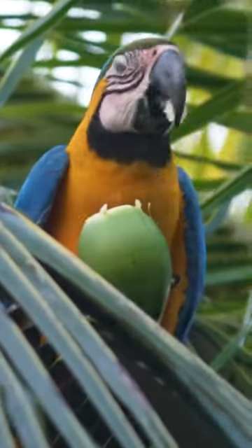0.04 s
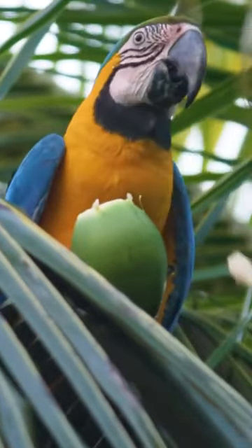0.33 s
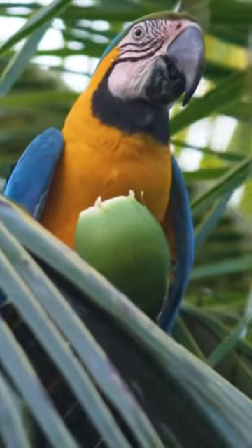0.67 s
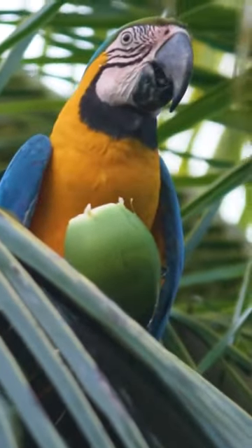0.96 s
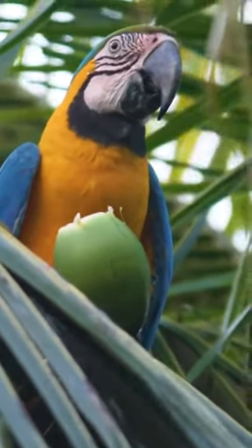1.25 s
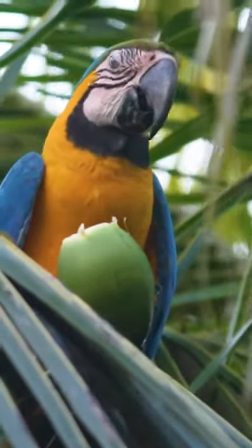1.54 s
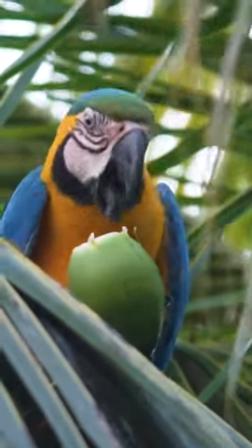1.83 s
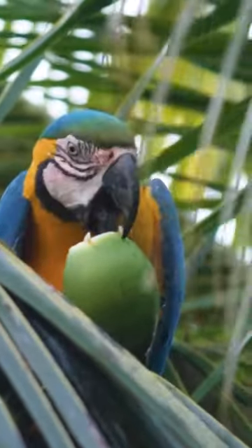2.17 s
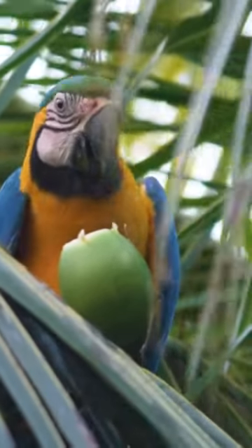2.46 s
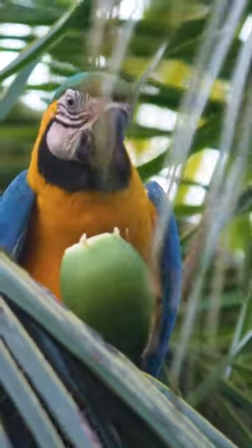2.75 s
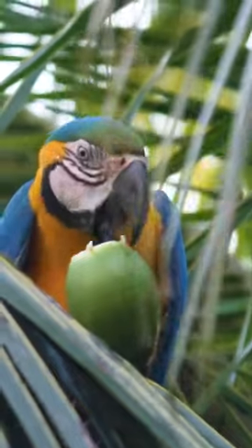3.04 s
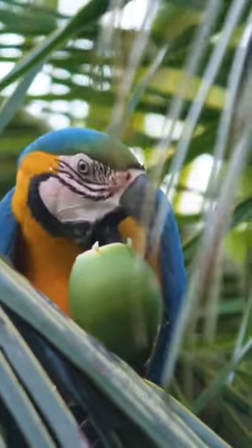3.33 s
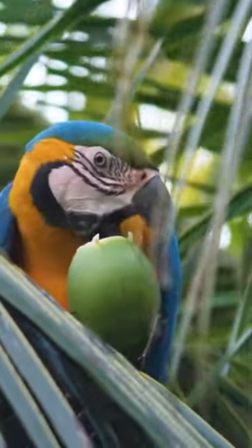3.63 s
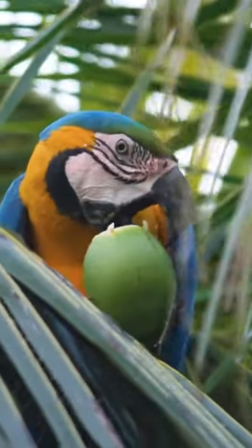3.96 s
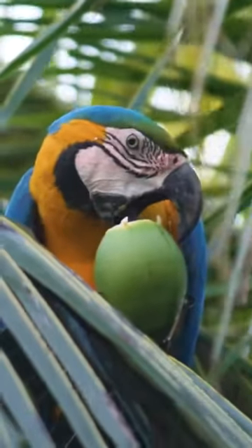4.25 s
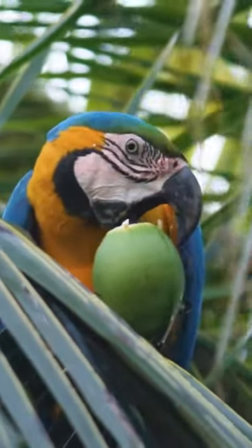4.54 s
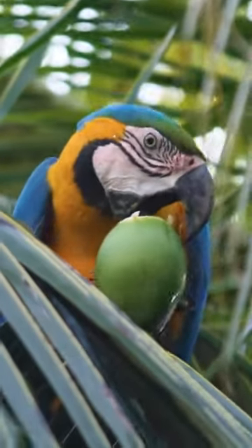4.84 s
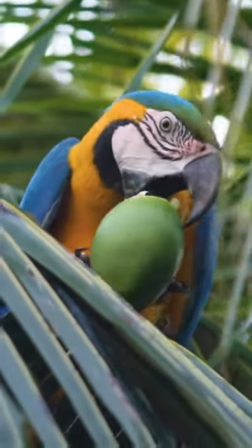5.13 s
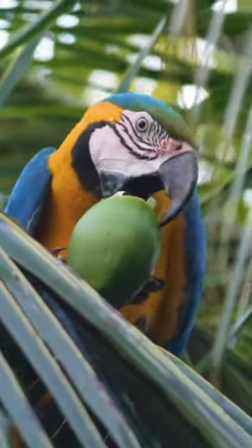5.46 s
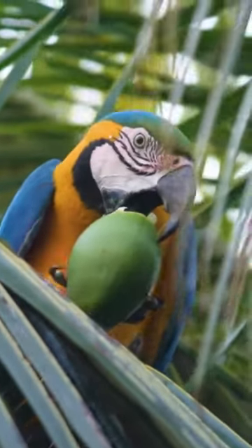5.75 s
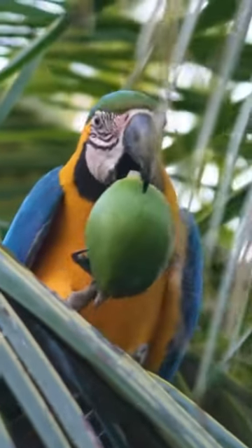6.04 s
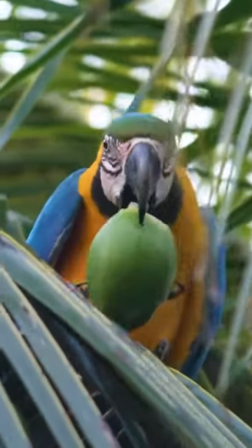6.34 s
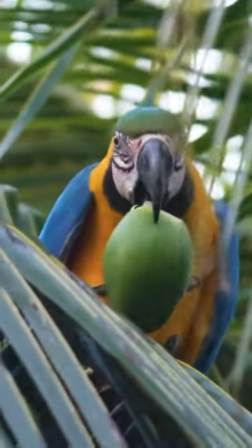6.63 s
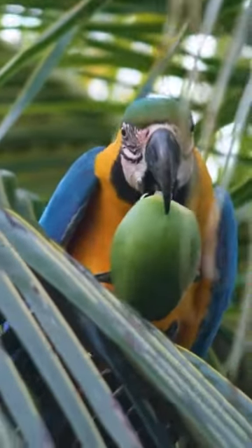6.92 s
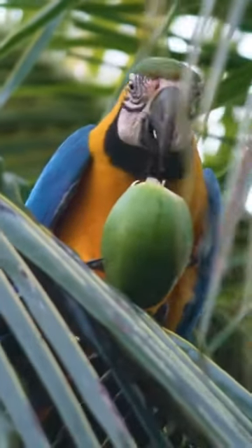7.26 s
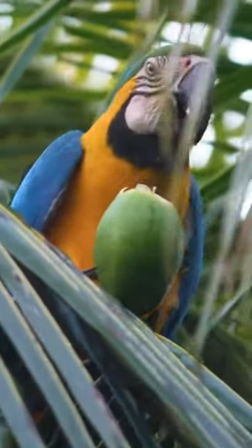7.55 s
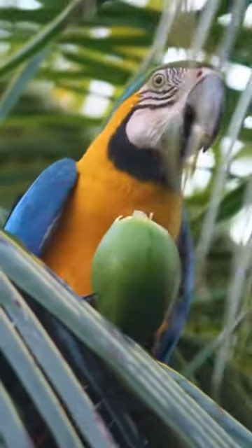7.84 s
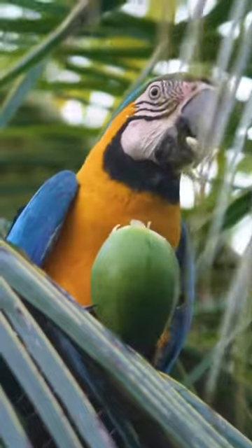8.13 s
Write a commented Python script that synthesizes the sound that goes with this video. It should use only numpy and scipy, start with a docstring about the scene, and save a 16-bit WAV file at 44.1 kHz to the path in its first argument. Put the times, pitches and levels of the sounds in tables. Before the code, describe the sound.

Macaws squawk, whistle and rasp among rustling palm fronds, then one cracks and tears into a coconut husk.

```python
"""A palm grove in a light breeze: fronds rustle and hiss, and eddies rumble on the microphone.
Macaws rasp and whistle close by while others squawk farther off among the trees; the hoarse calls
are syrinx pulses and breath through a moving throat. Then one bird bites into a green coconut:
the husk cracks and its fibres tear. The perch thuds softly as the bird shifts."""
import sys
import numpy as np
from scipy import signal
from scipy.io import wavfile
from scipy.ndimage import uniform_filter1d, map_coordinates

SR = 44100
rng = np.random.default_rng(int(sys.argv[2]) if len(sys.argv) > 2 else 0)


def transcribe(u):
    """Save the signal u as a 16-bit wav file named by the first command-line argument.

    u: samples, shape (n,) or (channels, n), limited to [-1, 1]; the rate is SR.
    q: integer samples, one column per channel.
    """
    v = np.clip(np.atleast_2d(u).T, -1, 1)
    q = np.round(v * 32767).astype(np.int16)
    wavfile.write(sys.argv[1], SR, q)


N = 369999

# Levels are relative within a layer. A crest is the point of an event where its swell tops out.
# dry fronds crumpling: (start [s], length [s], crest [0-1], level [dB], swell [dB], fade [dB])
FROND_STROKES = [(-.01, 0.064, 0.19, -37.5, -15, 8.5), (0.055, 0.12, 0.33, -31.5, 13, 15),
                 (.175, 0.172, 0.79, -36.5, 10, 10), (.34, 0.416, 0.34, -41.5, 4.5, 24)]
# snaps among the fronds: (time [s], level [dB])
FROND_SNAPS = [(0.09, -12), (0.121, -14), (0.182, -16), (0.203, -16), (0.223, -12.5), (0.276, -14),
               (0.3, -7.5), (0.313, -11.5)]
# papery tone of a dry frond: (frequency [Hz], gain [dB])
FROND_EQ = [(29, -56), (50, -18), (277, -16), (313, -13.5), (345, -22.5), (472, -1.5), (661, -10.5),
            (802, -7.5), (1820, -13), (2210, -7.5), (2750, -12), (3250, -10), (6090, -15.5), (12600, -56),
            (16000, -64)]
# rise and fall of the breeze: (time [s], level [dB])
BREEZE_LEVELS = [(0, -45.5), (.73, -50), (.8, -58.5), (1.15, -55.5), (1.7, -49.5), (1.9, -42.5),
                 (2.3, -46.5), (3.3, -49), (4.2, -48.5), (4.6, -54), (5.5, -49.5), (6.4, -50.5),
                 (7.1, -44.5), (7.4, -50), (7.85, -46.5), (8.05, -49), (8.39, -47.5)]
# broad hiss of leaves: (frequency [Hz], gain [dB])
LEAF_EQ = [(15, -29), (25, -2), (70, -11.5), (175, -10), (249, -14.5), (373, -7.5), (416, -8.5), (476, -9),
           (796, -10), (1400, -9), (1520, -8), (2110, -7.5), (5730, -5), (11600, -20), (16000, -30.5)]
# eddies on the microphone: (start [s], length [s], crest [0-1], level [dB], swell [dB], fade [dB])
EDDIES = [(0, 1.6, 0, -60, 5, 9), (1.797, 0.17, 0.16, -44, 24, 23), (6.33, 0.78, .6, -57, 8, 4),
          (7.09, 0.83, .05, -58.5, 2, 7)]
# far squawks: (start [s], length [s], crest [0-1], effort [dB], swell [dB], brightness [dB],
# mid-call pitch [Hz], glide [octaves], roughness [0-1], mid-call mouth [Hz], mid-call throat [Hz])
FAR_SQUAWKS = [(0.469, 0.23, 0.11, -31, 15, 1, 426, -0.37, .25, 870, 1876),
               (0.809, 0.099, 0.56, -35, 12, -2, 715, -.45, 0.15, 1300, 2160),
               (5.55, 0.21, 0.59, -44, 11, 4.5, 436, -0.0032, 0.21, 1660, 2480),
               (5.982, 0.27, 0.75, -42, 7, -29, 412, -0.12, 0.48, 850, 1220),
               (6.235, .445, 0.03, -34.3, 20, -4.5, 414, .02, .18, 1620, 2060),
               (7.744, .125, 0.54, -43.5, 17, -0.5, 359, 0, 0.72, 1180, 1530),
               (8.259, 0.16, .75, -36, 17, -8.5, 389, 0.011, 0.6, 1040, 1540)]
# a macaw's voice dulled by distance: (frequency [Hz], gain [dB])
FAR_VOICE_EQ = [(300, -28.5), (650, -4), (850, -5.5), (1250, 0.5), (1650, -0.5), (2050, -5.5), (2500, -4.5),
                (3300, -8), (4200, -13), (8000, -75)]
# quick arched notes: (start [s], rise [s], fall [s], top pitch [Hz], level [dB])
CHIRP_NOTES = [(.842, .016, 0.026, 1520, -31.5), (.868, .008, 0.0494, 1050, -39),
               (.892, 0.066, 0.01, 2700, -29), (.973, 0.051, .022, 2630, -32.5),
               (1.51, 0.071, .028, 2260, -35), (1.572, 0.026, .019, 2670, -29),
               (1.609, 0.021, 0.018, 2730, -30), (1.65, 0.0205, 0.016, 2430, -40),
               (1.679, .023, .01, 2580, -34), (4.245, 0.069, 0.025, 923, -52)]
# long whistles: (start [s], length [s], top pitch [Hz], level [dB])
WHISTLE_NOTES = [(1.975, 0.2, 2194, -29.5), (2.48, 0.18, 2207, -30), (2.893, 0.16, 2130, -34),
                 (3.469, 0.18, 2178, -30)]
# near rasps: (start [s], length [s], crest [0-1], effort [dB], swell [dB], brightness [dB],
# crest pitch [Hz], final roughness [0-1], mouth at start [Hz], mouth at end [Hz],
# throat at crest [Hz], throb rate [Hz; 1 or less means none])
NEAR_RASPS = [(1.109, .172, 0.96, -38.5, 21, -24, 440, .22, 330, 1150, 1330, 1),
              (1.287, 0.13, 0.66, -34, 17.5, -1, 339.4, 0.44, 1080, 1080, 1510, 0),
              (1.402, 0.12, 0.57, -24, 4, 1, 400, .62, 1270, 1300, 1540, 38.5),
              (2.26, .19, 0.78, -38.5, 18.5, 2, 367, 0.43, 766, 750, 1610, 1),
              (2.58, 0.16, 0.64, -48, 6.5, -27, 325, .25, 300, 580, 990, 0.5),
              (2.717, 0.21, 0.76, -26, 19.5, 3.5, 362, .36, 450, 1650, 2144, 0),
              (2.974, .168, 0.85, -22.8, 15, -2, 345, .6, 450, 1500, 1950, 41.5),
              (3.345, .19, 0.74, -44, 10, 2.5, 314, 0.49, 1300, 1350, 2150, 0),
              (3.627, 0.16, 0.82, -49.5, 4, -1.5, 338.5, 0.48, 1040, 990, 1910, 0)]
# a macaw's voice up close: (frequency [Hz], gain [dB])
NEAR_VOICE_EQ = [(150, -62), (250, -14.5), (346, -20.5), (418, -5), (711, -6.5), (919, -4.5), (1170, -2.5),
                 (1540, -3), (2750, -2), (3320, -6.5), (3940, -4.5), (5190, -7), (8100, -24), (9940, -23.5),
                 (15000, -38)]
# soft thuds of the perch: (time [s], level [dB], ring [Hz])
PERCH_THUDS = [(1.8, -42, 38), (5.621, -40, 115), (5.716, -44.5, 262), (5.853, -44, 207), (6.353, -41, 114),
               (6.466, -43, 153), (6.687, -25.5, 108), (6.834, -34, 145), (6.87, -32.5, 140),
               (6.925, -29.5, 135), (7.032, -36, 147), (7.71, -38.5, 160)]
# cracks of the husk: (time [s], level [dB], ring [Hz], brightness [dB])
HUSK_CRACKS = [(4.647, -25.5, 1360, -34), (4.672, -20.5, 1710, -34), (4.712, -9.5, 4180, -12),
               (4.752, -7, 1170, -14.5), (4.777, -10.5, 1060, -25), (4.801, -14, 1770, -9),
               (4.828, -16, 5400, -9), (4.845, -14.5, 5460, -25), (4.875, -9.5, 5700, -15),
               (4.882, -10, 3900, -10), (4.929, -14.5, 1520, -17), (4.963, -4.5, 1640, -30),
               (4.974, -15.5, 1510, -9), (5.009, -6.5, 1550, -28), (5.043, -8.5, 1320, -32),
               (5.055, -4.5, 1290, -21), (5.066, -8.5, 3480, -15), (5.077, -6, 3160, -28),
               (5.1, -9.5, 2470, -20), (5.122, -13.5, 3370, -24), (5.15, -6, 3260, -16),
               (5.157, -11, 3290, -10), (5.168, -15, 2510, -24), (5.197, -19.5, 3690, -21),
               (5.216, 2.5, 2800, -26), (5.228, -21, 1600, -17), (5.239, -17, 3720, -7),
               (5.278, -6.5, 3610, -6), (5.315, -12, 5070, -9), (5.336, -8, 4870, -11),
               (5.4, -6.5, 2800, -19), (5.587, -14, 3860, -4), (5.637, -13.5, 1600, -4),
               (5.736, -18.5, 2820, -4), (5.824, -15, 2340, -3), (5.863, -12.5, 2950, -9),
               (5.872, -13.5, 2220, -5), (5.965, -19, 2100, -4), (6.088, -15.5, 5650, -7),
               (6.167, -21.5, 1180, -20), (6.358, -19, 1580, -12), (6.726, -21, 4030, -30),
               (6.846, -25, 1740, -25), (7.094, -25, 4900, -21), (7.95, -24.5, 5270, -14),
               (8.179, -19.5, 3700, -16)]
# crunch of the green husk: (frequency [Hz], gain [dB])
HUSK_EQ = [(100, -37), (300, -18.5), (600, -7.5), (1000, -2), (1600, 1), (3200, 2.5), (6000, 2),
           (8000, -4.5), (10500, -5.5), (13000, -14), (16000, -21.5)]
# pulls that tear fibres: (start [s], length [s], crest [0-1], level [dB], swell [dB], fade [dB])
BEAK_PULLS = [(4.687, 0.27, .65, -42.5, 16, 10), (4.95, .32, .6, -49.5, 4, 2), (5.27, .1, .6, -42, 3, 14),
              (5.575, .04, 0.13, -35, 12, 10), (5.615, .18, .2, -43, 4, 6),
              (5.794, 0.6, 0.41, -41, 3, 22.5), (6.67, 0.12, .15, -43.5, 11, 5.5),
              (6.803, 0.38, .4, -58, 4, 15)]
# bright rip of the fibres: (frequency [Hz], gain [dB])
FIBRE_EQ = [(150, -10.5), (250, -5.5), (670, -7), (1300, 3.5), (3000, 3.5), (6000, 3), (8300, 2),
            (11000, -3.5), (13400, -2), (16000, -13)]
# echo tail among the trees: (frequency [Hz], time to fall 60 dB [s])
GROVE_DECAY = [(200, .35), (1500, .42), (3000, .45), (8000, .2)]
# ripple in the microphone's treble: (frequency [Hz], gain [dB])
MICROPHONE_EQ = [(5000, 0.5), (6350, 0.5), (6650, -3.5), (7650, 1.5), (7950, -4.5), (8800, 0),
                 (11000, -0.5)]


def amp(db):
    """Decibels to gain."""
    return 10 ** (np.asarray(db) / 20)


def unit(x):
    """Scales to rms 1."""
    return x / np.sqrt(np.mean(x ** 2) + 1e-20)


def curve_at(points, hz):
    """Reads a curve on a log-frequency axis."""
    f, value = np.transpose(points)
    return np.interp(np.log(hz + 1), np.log(f + 1), value)


def add(mix, start, sound):
    """Mixes a sound in at a time in seconds."""
    part = mix[max(round(start * SR), 0):][:len(sound)]
    part += sound[:len(part)]


def band(x, edges_hz):
    """Band-pass."""
    return signal.sosfilt(signal.butter(3, edges_hz, "band", fs=SR, output="sos"), x)


def highs(x, hz, order):
    """The treble above hz, with no phase shift."""
    return signal.sosfiltfilt(signal.butter(order, hz, "high", fs=SR, output="sos"), x)


def colour(x, eq, size=2048):
    """Minimum-phase EQ, which keeps attacks sharp."""
    gain_db = np.maximum(curve_at(eq, abs(np.fft.fftfreq(size, 1 / SR))), -100)
    log_response = np.conj(signal.hilbert(np.log(amp(gain_db))))
    taps = np.fft.ifft(np.exp(log_response)).real
    return signal.fftconvolve(x, taps[:size // 2])[:len(x)]


def resonate(x, hz, width_hz):
    """A resonance at a fixed or moving frequency."""
    turn = np.exp(2j * np.pi * np.cumsum(hz * np.ones(len(x))) / SR)
    pole = np.exp(-np.pi * width_hz / SR)
    return 2 * (turn * signal.lfilter([1 - pole], [1, -pole], x / turn)).real


def wander(count, hz):
    """Smooth random drift of rms 1, changing hz times a second."""
    at = np.arange(count) * hz / SR
    return unit(map_coordinates(rng.standard_normal(4096), [at], order=3, mode="wrap"))


def fade(count, edge_s=.0053):
    """Window with soft ends."""
    return signal.windows.tukey(count, min(1, 2 * edge_s * SR / count))


def course(length):
    """Seconds into an event, and its progress u from 0 to 1."""
    t = np.arange(0, length, 1 / SR)
    return t, t / length


def swell(u, crest, swell_db, fade_db):
    """Envelope in dB that climbs to a rounded crest and falls away."""
    crest = np.clip(crest, .01, .99)
    before = np.maximum(1 - u / crest, 0)
    after = np.maximum((u - crest) / (1 - crest), 0)
    return -swell_db * before ** 2.21 - fade_db * after ** 1.55


def grains(per_s, spread_db, hiss):
    """Tiny ticks of unequal size over a fine hiss."""
    size = amp(spread_db * np.minimum(rng.exponential(1, N), 4))
    ticks = size * rng.choice([-1, 1], N) * (rng.random(N) < per_s / SR)
    return unit(ticks) + hiss * rng.standard_normal(N)


def strokes(texture, rows):
    """Plays a steady texture in strokes that swell and fade."""
    gain = np.zeros(N)
    for start, length, crest, db, swell_db, fade_db in rows:
        _, u = course(length)
        add(gain, start, amp(db + swell(u, crest, swell_db, fade_db)) * fade(len(u)))
    return unit(texture) * gain


def fronds(level_db=5.5, snap_db=-3, clump_db=3, snap_t60_s=.0095):
    """Dry leaflets crumple, with a few sharper snaps."""
    crackle = grains(per_s=1800, spread_db=1.5, hiss=.41) * amp(clump_db * wander(N, hz=130.8))
    out = amp(level_db) * strokes(colour(crackle, FROND_EQ), FROND_STROKES)
    t = np.arange(1500) / SR
    for start, db in FROND_SNAPS:
        click = rng.standard_normal(len(t)) + 6 * (t == 0)
        snap = colour(click * amp(-60 * t / snap_t60_s), FROND_EQ)
        add(out, start, amp(db + snap_db) * snap / abs(snap).max())
    return out


def breeze(patchy_db=2.5, flicker_db=.95):
    """A bed of hiss from many leaves, in drifting patches with faint ticks."""
    leaves = grains(per_s=500, spread_db=8.5, hiss=2.4)
    hz, _, spectra = signal.stft(leaves, SR, nperseg=1024, noverlap=768)
    patches = uniform_filter1d(rng.standard_normal(spectra.shape), 14, axis=0)
    patches = unit(uniform_filter1d(patches, 10, axis=1))
    spectra *= amp(curve_at(LEAF_EQ, hz)[:, None] + patchy_db * patches)
    hiss = signal.istft(spectra, nperseg=1024, noverlap=768)[1][:N]
    gust_db = np.interp(np.arange(N) / SR, *np.transpose(BREEZE_LEVELS))
    return unit(hiss) * amp(gust_db + flicker_db * wander(N, hz=39.2))


def wind_rumble(level_db=-2):
    """Lumpy eddies buffet the microphone with low end."""
    bass_eq = [(15, -6), (35, -3), (80, -2.5), (150, -16), (400, -48), (2000, -82)]
    return amp(level_db) * strokes(colour(rng.standard_normal(N), bass_eq, size=8192), EDDIES)


def macaw_voice(effort_db, bright_db, hz, rough, resonances, eq,
                body_hz, edge_hz, jitter, shimmer_db, breath, width_hz, leak):
    """Uneven syrinx pulses and puffs of air pass through moving throat resonances."""
    n = len(hz)
    cycles = np.cumsum(hz * (1 + jitter * rough * wander(n, hz=160))) / SR
    pulses = unit(sum(np.cos(2 * np.pi * k * cycles) for k in range(1, 36)))
    pulses *= amp(shimmer_db * np.sqrt(rough) * wander(n, hz=450))
    puffs = unit((.3 + np.exp(-(cycles % 1) / .3)) * rng.standard_normal(n))
    drive = colour(unit(pulses) + breath * rough * puffs, eq)
    voice = leak * drive
    for centre_hz in resonances:  # the tongue trembles, so each wavers on its own
        voice += resonate(drive, centre_hz * (1 + .05 * wander(n, hz=45)), width_hz)
    # fronds around the bird send back a few reflections within milliseconds
    reflections = .4 * rng.standard_normal(400) * (rng.random(400) < .03) * np.linspace(1, 0, 400)
    voice += signal.fftconvolve(voice, reflections)[:n]
    # brightness sets the voice's edge against its body
    treble = highs(voice, (body_hz[1] + edge_hz[0]) / 2, order=2)
    body = (voice - treble) / band(voice, body_hz).std()
    edge = treble / band(voice, edge_hz).std()
    return amp(effort_db) * (body + amp(bright_db) * edge) * fade(n, edge_s=.003)


def far_macaws(level_db=-1.5, droop=.12, waver=.009, brighten_db=13.5):
    """Hoarse, distant squawks that thin out as they go; the throat moves with the pitch."""
    out = np.zeros(N)
    for (start, length, crest, db, swell_db, bright_db,
         hz, glide, rough, mouth_hz, throat_hz) in FAR_SQUAWKS:
        _, u = course(length)
        arch = 1 - droop * abs(2 * u - 1) ** 3.6  # the pitch sags at both ends
        bend = arch * 2 ** (glide * (u - .5)) * (1 + waver * wander(len(u), hz=16))
        squawk = macaw_voice(
            effort_db=db + swell(u, crest, swell_db, fade_db=12),
            bright_db=bright_db + brighten_db * (u - .5), hz=hz * bend, rough=rough,
            resonances=(mouth_hz * bend, throat_hz * bend, 1.21 * throat_hz * bend),
            eq=FAR_VOICE_EQ, body_hz=(700, 1900), edge_hz=(2000, 3500),
            jitter=.15, shimmer_db=6, breath=2.6, width_hz=200, leak=.1)
        add(out, start, squawk)
    return amp(level_db) * out


def whistle_tone(hz, overtone_db, waver, flutter_db):
    """A nearly pure, slightly unsteady tone."""
    phase = 2 * np.pi * np.cumsum(hz * (1 + waver * wander(len(hz), hz=300))) / SR
    tone = np.sin(phase) + amp(overtone_db) * np.sin(2 * phase)
    return unit(tone * amp(flutter_db * wander(len(hz), hz=153)))


def macaw_whistles(crest=.53, taper_db=17):
    """Long whistles on a shallow arch, and quick chirps that sweep up and drop."""
    out = np.zeros(N)
    for start, length, top_hz, db in WHISTLE_NOTES:
        _, u = course(length)
        off_top = np.where(u < crest, 1 - u / crest, (u - crest) / (1 - crest)) ** 2.15
        sag = off_top * np.where(u < crest, .18, .11)
        tone = whistle_tone(top_hz * (1 - sag), overtone_db=-19, waver=.0089, flutter_db=2)
        add(out, start, amp(db - taper_db * off_top) * fade(len(u)) * tone)
    for start, rise, fall, top_hz, db in CHIRP_NOTES:
        t, u = course(rise + fall)
        sag = np.where(t < rise, .24 * abs(1 - t / rise) ** 1.394, .11 * ((t - rise) / fall) ** 2)
        tone = whistle_tone(top_hz * (1 - sag), overtone_db=-30, waver=.025, flutter_db=3)
        add(out, start, amp(db) * np.sin(np.pi * u) * tone)
    return out


def near_macaws(throb_db=13, gape_octaves_per_db=.018, pitch_octaves_per_db=.12, treble_per_db=.66):
    """Rasps roughen as they go and rise and brighten with the push; the hardest break into throbs."""
    out = np.zeros(N)
    for (start, length, crest, db, swell_db, bright_db,
         hz, rough, from_hz, to_hz, throat_hz, throb_hz) in NEAR_RASPS:
        t, u = course(length)
        push_db = swell(u, crest, swell_db, fade_db=11)
        dips_db = throb_db * np.cos(np.pi * throb_hz * t) ** 4 * (throb_hz > 1)
        gape = 2 ** (gape_octaves_per_db * (push_db - dips_db / 2))  # effort lifts the throat resonances
        mouth_hz = from_hz + (to_hz - from_hz) * u
        rasp = macaw_voice(
            effort_db=db + push_db - dips_db, bright_db=bright_db + treble_per_db * push_db,
            hz=hz * 2 ** (pitch_octaves_per_db * push_db), rough=rough * (.6 + .4 * u),
            resonances=(mouth_hz, throat_hz * gape, 1.81 * throat_hz * gape),
            eq=NEAR_VOICE_EQ, body_hz=(300, 1700), edge_hz=(2900, 6500),
            jitter=.21, shimmer_db=4, breath=1.2, width_hz=240, leak=.3)
        add(out, start, rasp)
    return out


def perch_thuds(level_db=-1, rise_s=.0035, t60_s=.16, scuff_gain=.88):
    """The loaded stalk gives a low, damped push with a dull scuff."""
    out, t = np.zeros(N), np.arange(SR // 3) / SR
    envelope = (1 - np.exp(-(t / rise_s) ** 2)) * amp(-60 * t / t60_s)
    for start, db, hz in PERCH_THUDS:
        scuff_eq = [(hz / 4, -24), (hz, 0), (3 * hz + 150, -15), (3000, -45)]
        scuff = unit(colour(rng.standard_normal(len(t)), scuff_eq))
        thud = (np.sin(2 * np.pi * hz * t) + scuff_gain * scuff) * envelope
        add(out, start, amp(db + level_db) * thud / abs(thud).max())
    return out


def husk_cracks(level_db=-4, knock_db=1.5, tail_db=-27, tail_t60_s=.07, brittleness=.23):
    """A fibre bundle snaps, a short run of fractures follows, and the wet husk gives a damped knock."""
    out, t = np.zeros(N), np.arange(3000) / SR
    for start, db, hz, bright_db in HUSK_CRACKS:
        run_s = .018 * amp(-brittleness * (db + 11))  # a harder crack is shorter
        envelope = amp(-60 * (t / run_s) ** 1.5) + amp(tail_db - 60 * t / tail_t60_s)
        fractures = rng.standard_normal(len(t)) * envelope
        fractures[0] = 4.6  # the opening snap
        burst = unit(colour(fractures, HUSK_EQ))
        knock = unit(resonate(burst, hz, width_hz=350 + .12 * hz))
        shelf_db = np.clip(bright_db + 16, -12, 12)
        crack = burst + (amp(shelf_db) - 1) * highs(burst, 6800, order=4) + amp(knock_db) * knock
        near_peak = np.sort(abs(crack))[-3]
        add(out, start, amp(db + level_db) * crack / near_peak)
    return out


def tearing_fibres(level_db=4.5, clump_db=2):
    """The beak drags through the husk and fibres part in clumps."""
    crackle = grains(per_s=1500, spread_db=4.5, hiss=.6) * amp(clump_db * wander(N, hz=160))
    return amp(level_db) * strokes(colour(crackle, FIBRE_EQ), BEAK_PULLS)


def grove_echoes(send, echoes_per_s=2000, predelay_samples=300):
    """Scattered echoes from trunks and leaves; the high treble dies first."""
    taps = rng.standard_normal(SR) * (rng.random(SR) < echoes_per_s / SR)
    taps *= np.arange(SR) > predelay_samples
    hz, t, spectra = signal.stft(taps, SR, nperseg=256)
    decay = amp(-60 * t / curve_at(GROVE_DECAY, hz)[:, None])
    tail = signal.istft(spectra * decay, SR, nperseg=256)[1]
    return signal.fftconvolve(send, tail / np.linalg.norm(tail))[:N]


def scene():
    """The bite sits close and nearly dry; the farther a caller, the more echo it brings."""
    bite = husk_cracks() + tearing_fibres()
    near, far, whistles = near_macaws(), far_macaws(), macaw_whistles()
    echoes = grove_echoes(amp(-21.5) * bite + amp(-23.5) * near + amp(-12) * far + amp(-17.5) * whistles)
    calls = near + far + whistles
    return (bite + calls + echoes + fronds() + perch_thuds() + wind_rumble() + breeze())[None]


def record(dry, cutoff_hz=15950):
    """Microphone colour, then a steep high cut."""
    heard = colour(dry[0], MICROPHONE_EQ)
    high_cut = signal.firwin(511, cutoff_hz, window=("kaiser", 9), fs=SR)
    return signal.oaconvolve(heard, high_cut, "same")[None]


dry = scene()
out = record(dry)
transcribe(out)
```